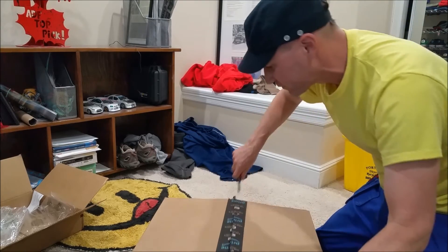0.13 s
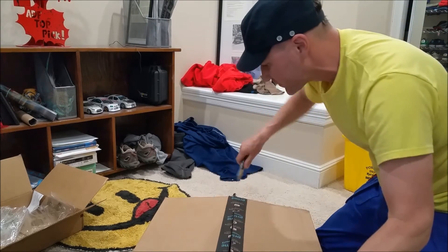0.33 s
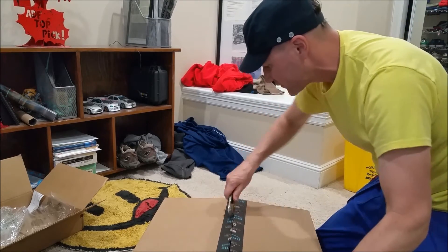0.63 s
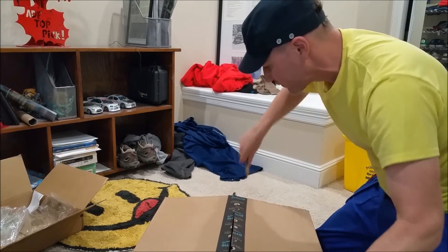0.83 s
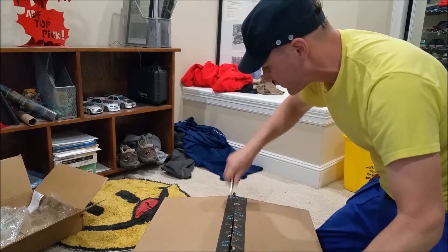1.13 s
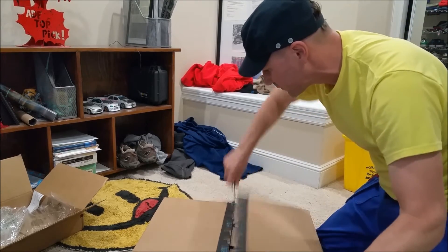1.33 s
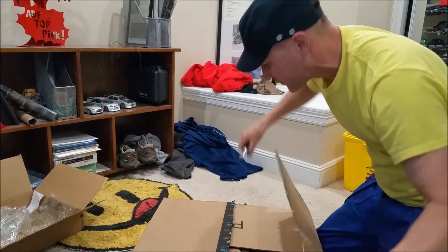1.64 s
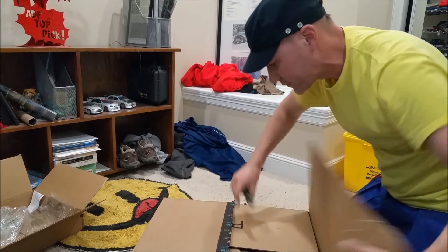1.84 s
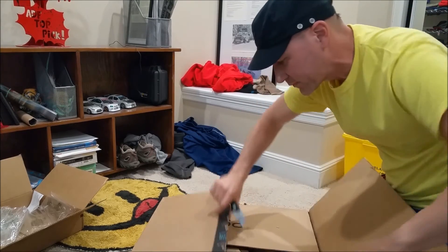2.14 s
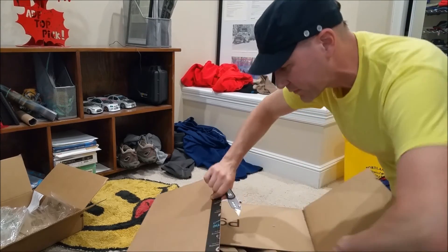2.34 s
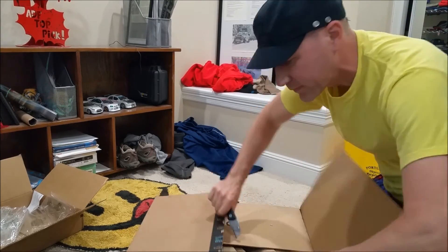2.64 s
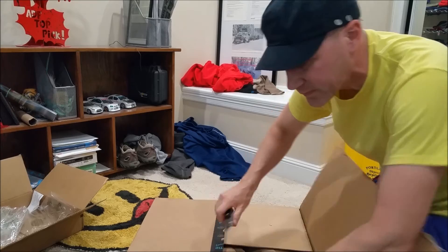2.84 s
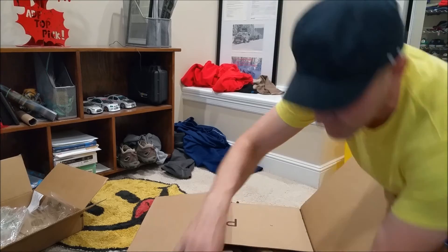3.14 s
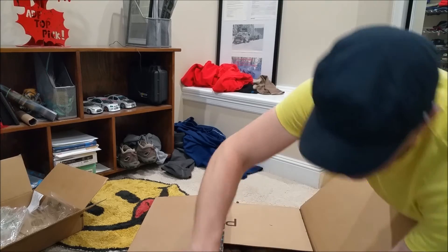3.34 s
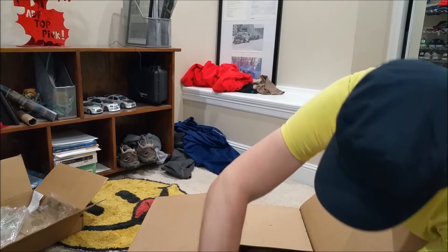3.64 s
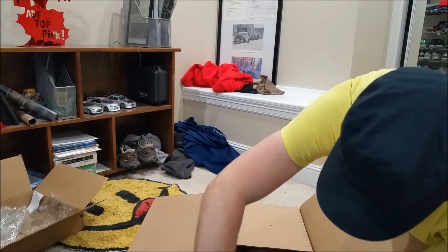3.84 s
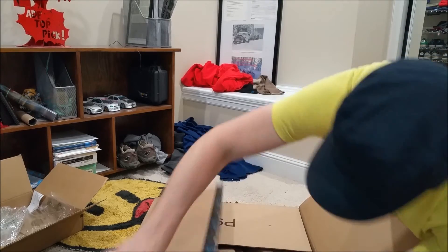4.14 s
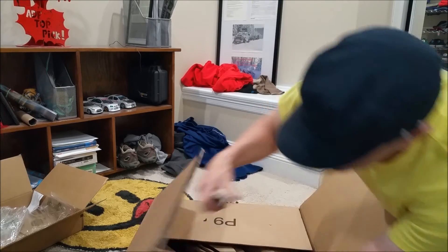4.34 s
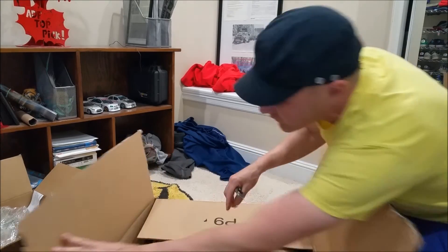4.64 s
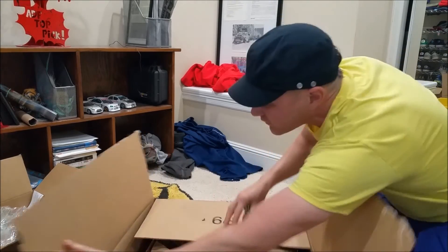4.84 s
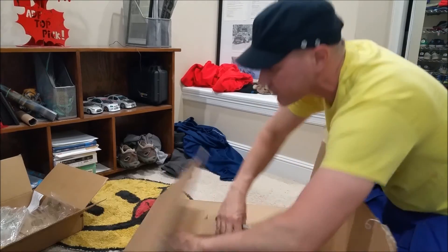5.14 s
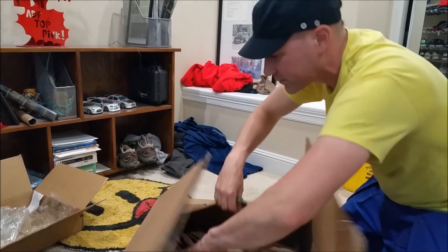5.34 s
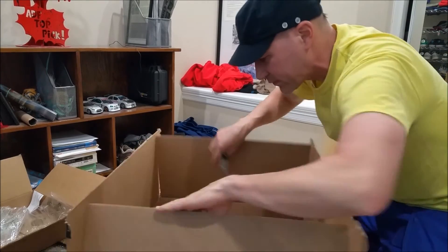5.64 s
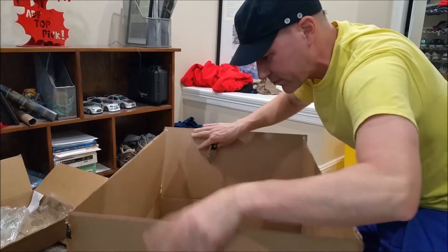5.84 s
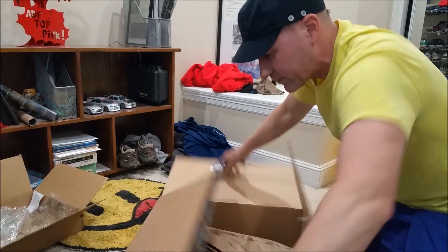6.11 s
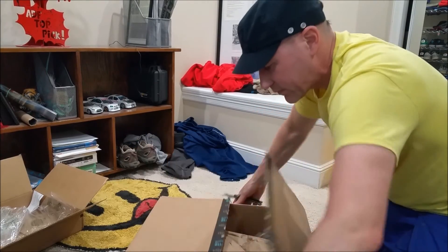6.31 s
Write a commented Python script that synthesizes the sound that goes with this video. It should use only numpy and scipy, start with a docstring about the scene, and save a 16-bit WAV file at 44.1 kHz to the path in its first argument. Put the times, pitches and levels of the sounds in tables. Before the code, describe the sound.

Close-up box opening: short tape-cutting scrapes, sharp cardboard snaps, low hollow thuds of flaps, and a final flurry of rough rubbing and rustle.

```python
"""Opening a cardboard box

A blade slits the tape of a cardboard box on a carpet; hands pull the flaps open and stiff paper rustles.
Rubbing and tearing are dense random clicks, heard directly in coloured bands and through damped panel modes.
Tape and board let go in resonant snaps; thuds are one low, wandering tone of the air inside the box.
A small furnished room adds a short tail, rumble, hiss and a faint appliance hum. A two-port phone microphone
hears it close by, its ports alike in the bass, unlike through the middle and alike again in the high treble."""
import sys
import numpy as np
from scipy import signal
from scipy.fft import rfft, irfft, next_fast_len
from scipy.io import wavfile
from scipy.ndimage import uniform_filter1d

SR = 44100
rng = np.random.default_rng(int(sys.argv[2]) if len(sys.argv) > 2 else 0)


def transcribe(signal):
    """Save signal, clipped to [-1, 1], as a 16-bit WAV file at the path in sys.argv[1]."""
    frames = np.atleast_2d(signal).T
    limited = np.clip(frames, -1, 1)
    pcm = np.round(limited * 32767).astype(np.int16)
    wavfile.write(sys.argv[1], SR, pcm)


N = 285327
SIZE = next_fast_len(N + SR)  # transform length, padded so that tails do not wrap round
HZ = np.arange(SIZE // 2 + 1) * SR / SIZE + 1  # 1 Hz up, so that its logarithm exists

# Steady noise of the room. Each row: frequency in Hz, relative density in dB per Hz.
AIR_COLOUR = [(25, 3.5), (64, 10.5), (100, -24), (290, 0), (400, -3), (1200, -11.5), (2000, -18.5),
              (7000, -95), (16000, -61)]
AIR_DB = -51.5
# Tones of the appliance. Each row: mean frequency in Hz, level before wavering in dB rms.
HUM_TONES = [(166.9, -57.5), (290.7, -58.5), (619.1, -64), (1857, -69)]

# Strokes of blade, fingers and paper on board. Each row: time of full level in seconds, rise in seconds,
# hold in seconds, then the levels of panels, dull rub, bright rasp and fine hiss in dB.
STROKES = [(0.0, .01, 0.2, -32.5, -35.5, -40.5, -43), (0.273, 0.078, 0.016, -26, -31, -37.5, -41.5),
           (0.374, 0.0021, 0.0099, -18.5, -25.5, -27.5, -33),
           (0.818, 0.0027, 0.0029, -23.5, -35.5, -58, -68), (0.893, 0.092, 0.012, -23.5, -31, -40.5, -40.5),
           (0.946, 0.075, 0.027, -23, -30.5, -37.5, -39.5), (1.418, 0.022, 0.022, -27, -46, -55.5, -57),
           (1.47, 0.0087, 0.027, -24, -37.5, -42.5, -42), (1.517, 0.018, 0.052, -21, -30.5, -35, -38.5),
           (2.006, 0.049, 0.023, -44, -50, -47.5, -50), (2.191, .006, 0.16, -39, -52.5, -54.5, -56),
           (2.339, .006, 0.019, -43, -41, -40, -49), (2.703, 0.14, 0.021, -68, -61, -64, -53.5),
           (2.839, 0.0071, 0.013, -34.5, -47, -65, -58), (2.898, 0.068, 0.041, -31.5, -46, -52.5, -54),
           (3.288, 0.35, 0.022, -60, -45.5, -48.5, -59), (3.49, 0.14, 0.086, -43, -40.5, -45, -52),
           (4.098, 0.1, 0.011, -39, -43, -43.5, -48.5), (4.128, 0.0049, 0.024, -13.5, -26, -32, -43),
           (4.24, 0.037, 0.14, -54, -44, -49, -53.5), (4.453, 0.04, 0.018, -48, -44.5, -56, -63),
           (4.868, 0.16, 0.081, -41.5, -51, -57.5, -51), (5.228, 0.14, 0.035, -47, -41, -50, -60),
           (5.347, .012, 0.17, -38.5, -55, -76, -79), (5.627, 0.16, 0.038, -29, -37, -35, -31),
           (5.769, 0.0051, 0.061, -13, -31.5, -39, -39.5), (5.85, .1, 0.098, -25, -36, -33, -35),
           (6.02, 0.055, 0.075, -30.5, -40, -40, -34.5), (6.097, 0.011, 0.0062, -19.5, -32.5, -37, -61),
           (6.262, 0.082, 0.014, -42, -43, -50, -45.5), (6.411, 0.024, 0.026, -37, -40.5, -50, -43)]
STROKE_FALL_S = 0.12
SPAN_DB = 30  # a rise or fall time covers this many dB
# Hands resting and shifting on the box between strokes. Each row: time in seconds, level in dB.
HANDLING = [(1.5, -65.5), (1.75, -59), (2.2, -53.5), (2.8, -57.5), (3.1, -54), (3.7, -55), (4.0, -63.5),
            (4.3, -48.5), (4.65, -59.5), (5.0, -50), (5.5, -53.5), (5.75, -48.5), (6.3, -51.5), (6.47, -41)]
# Handling levels in dB added for panels, rub, rasp and hiss, in that order.
HANDLING_MIX_DB = [6, 0, -4.5, -8]
HANDLING_BOOM_DB = 0.5  # added for the air in the box

# Damped modes of the panels. Each row: frequency in Hz, relative amplitude in dB, 60 dB decay in seconds.
PANEL_MODES = [(60.6, -17.5, 0.61), (154.6, -2.5, 0.15), (199, -1.5, 0.02), (241.5, 5.5, 0.11),
               (281.3, -2.5, 0.2), (376, 11.5, 0.024), (455, 4.5, 0.029), (506.4, -9, 0.16),
               (638, -9.5, 0.03), (827, -6, 0.037)]
# Colour of the dull rub. Each row: frequency in Hz, relative density in dB per Hz.
RUB_COLOUR = [(450, -20), (750, -6.5), (1300, -7), (2800, -11)]
# Colour of the bright rasp. Each row: frequency in Hz, relative density in dB per Hz.
RASP_COLOUR = [(2700, -16), (3600, 3.5), (5400, 0.5), (6500, -0.5), (7800, -10)]
# Colour of the fine hiss. Each row: frequency in Hz, relative density in dB per Hz.
HISS_COLOUR = [(6500, -12.5), (8500, -12), (11000, -7), (14500, -10.5)]
# An edge dragged along board or tape rings in one band. Each row: start in seconds, length before
# the fade in seconds, centre in Hz, width of each of two filter passes in Hz, level in dB.
SQUEALS = [(0.052, 0.081, 4780, 1000, -51), (1.47, .13, 6560, 800, -47), (5.85, 0.1, 3530, 1000, -43),
           (6.017, 0.054, 5270, 1810, -38)]

# Palms and flaps shoving the air in the box. Each row: time of full level in seconds, rise in seconds,
# fall in seconds, level in dB.
THUMPS = [(0.22, .2, 0.28, -27), (0.43, 0.12, .16, -25.5), (0.84, 0.055, 0.14, -29),
          (0.92, 0.12, 0.076, -21), (1.04, 0.11, 0.074, -32), (1.5, 0.16, 0.09, -33),
          (1.563, 0.044, 0.087, -9), (1.638, 0.02, 0.12, -17), (2.27, 0.13, 0.081, -33),
          (2.89, 0.073, 0.28, -34.5), (3.14, 0.32, 0.15, -37), (4.158, 0.034, 0.078, -14),
          (4.285, 0.17, 0.2, -21.5), (4.94, 0.071, 0.11, -39.5), (5.25, 0.18, 0.11, -43.5),
          (5.39, 0.061, 0.026, -25), (5.519, 0.06, 0.069, -18), (5.7, 0.086, 0.21, -24.5),
          (5.83, 0.1, 0.17, -20.5), (5.96, .08, 0.45, -37.5), (6.265, 0.041, 0.054, -33.5),
          (6.46, 0.031, .1, -25)]
# The air in the box rings higher once the last flaps stand open.
CAVITY_HZ, OPEN_HZ, OPENS_S = 95.1, 132.4, 5.77

# Tape and board letting go. Each row: start in seconds, relative level in dB, centre in Hz.
SNAPS = [(0.375, -11.5, 1710), (0.817, -28.5, 890), (1.408, -35.5, 1600), (1.466, -28, 1200),
         (1.545, -13.5, 1800), (1.906, -39.5, 3600), (1.997, -44, 5700), (2.195, -38, 900),
         (2.344, -29, 3200), (2.837, -38.5, 2180), (3.154, -42, 2500), (3.24, -45.5, 740),
         (3.366, -33.5, 805), (3.377, -41.5, 710), (3.396, -38, 2000), (3.45, -33, 4470), (3.656, -39, 900),
         (3.741, -34.5, 1490), (4.118, -15, 2310), (4.125, -16.5, 3000), (4.248, -26, 1400),
         (4.322, -35, 2210), (4.553, -42.5, 2450), (5.194, -38, 2200), (5.347, -39.5, 4000),
         (5.531, -40, 3000), (5.771, -13, 980), (5.809, -30, 2010), (6.098, -30.5, 584),
         (6.26, -31.5, 1190), (6.437, -26, 766)]
SNAP_Q, SNAP_SLOPE = 3.96, 0.26  # sharpness at 1 kHz; its exponent makes low knocks ring more than high ticks
SNAP_PUSH_DB = 6.5  # drive of the snaps into the panels

ROOM_T60_S, ROOM_DB = 0.22, -12.5

# Likeness of the two ports. Each row: frequency in Hz, likeness from 0 to 1.
PORT_LIKENESS = [(60, 0.86), (300, 1), (700, 0.52), (1400, 0.0956), (6000, 0.12), (9000, 0.83)]
# Shading by the phone's body. Each row: frequency in Hz, left minus right in dB.
PORT_TILT = [(60, -2), (200, 2.5), (1300, 0), (2400, 2.5), (4400, -2), (6800, -10), (9000, 0.5)]
BASS_CUT_HZ, TOP_HZ = 50.6, 15850
CEILING = 0.95  # full scale is 1


def undb(db):
    """Decibels express the logarithm of an amplitude ratio."""
    return 10 ** (np.asarray(db) / 20)


def unit(x):
    """Division by the root mean square gives unit power."""
    return x / np.sqrt(np.mean(x ** 2))


def along(table):
    """A spectrum known at a few points is interpolated on a logarithmic frequency axis."""
    hz, value = np.transpose(table)
    return np.interp(np.log(HZ), np.log(hz), value)


def shape(x, gain):
    """A linear filter multiplies the spectrum of a sound."""
    return irfft(rfft(x, SIZE) * gain, SIZE)[..., :N]


def walk(rate):
    """Random fluctuation: 'rate' Gaussian levels a second, joined by slews; spread near 1."""
    k = int(SR / rate)
    steps = np.repeat(rng.standard_normal(N // k + 1), k)
    return uniform_filter1d(steps, k)[:N]


def tone(hz):
    """A sinusoid of rms 1 whose phase is the running sum of its frequency."""
    return np.sqrt(2) * np.sin(2 * np.pi * np.cumsum(hz) / SR)


def swells(s, rise, hold, fall, *levels_db):
    """Gain of each layer: events rise and fall exponentially, and the powers of separate events add."""
    step = 32  # samples between computed gains
    t = np.arange(0, N + step, step) / SR - s[:, None]
    before = -t / rise[:, None]
    after = (t - hold[:, None]) / fall[:, None]
    distance = np.maximum(np.maximum(before, after), 0)
    power = undb(2 * np.array(levels_db)) @ undb(-2 * SPAN_DB * distance)
    return [np.interp(np.arange(N), np.arange(len(p)) * step, np.sqrt(p)) for p in power]


def air():
    """Stationary noise is coloured as rumble and hiss; hum is a sum of tones wavering in level and pitch."""
    hum = 0
    for hz, db in HUM_TONES:
        level = undb(db + 2.5 * walk(9))
        hum = hum + level * tone(hz * (1 + .012 * walk(30)))
    noise = shape(rng.standard_normal((2, N)), undb(along(AIR_COLOUR)))
    return undb(AIR_DB) * unit(noise) + hum


def handling_db():
    """The level of continuous contact is interpolated between the tabled times."""
    s, db = np.transpose(HANDLING)
    return np.interp(np.arange(N) / SR, s, db)


def hands():
    """Gains of panels, rub, rasp and hiss: the powers of strokes and quiet handling add."""
    s, rise, hold, *levels_db = np.transpose(STROKES)
    fall = np.full(len(s), STROKE_FALL_S)
    strokes = swells(s, rise, hold, fall, *levels_db)
    return np.hypot(strokes, undb(handling_db() + np.array(HANDLING_MIX_DB)[:, None]))


def slips(spread_db, patchy_db, rate):
    """Stick-slip of fibres: dense clicks of random size in uneven patches; one stream shared, one scattered."""
    excess = np.minimum(rng.exponential(size=N), 6.2)
    size = undb(spread_db * excess + patchy_db * walk(rate))
    return unit(size * rng.standard_normal((2, N)))


def ring(force, modes):
    """Modal resonance: a force excites damped sinusoids; a steady random force of rms 1 gives rms 1."""
    t = np.arange(SR // 2) / SR
    body = sum(undb(db) * np.sin(2 * np.pi * hz * t) * 1000. ** (-t / t60) for hz, db, t60 in modes)
    return shape(force, rfft(body / np.sqrt(np.sum(body ** 2)), SIZE))


def scrape(clicks, colour, drift_db):
    """Moving contact filters the clicks: each third of an octave swells and fades independently."""
    low, high = np.log2(colour[0][0]), np.log2(colour[-1][0])
    total = 0
    for centre in np.arange(low, high + .2, 1 / 3):
        band = np.exp(-((np.log2(HZ) - centre) / .25) ** 2)
        drift = undb(drift_db * walk(24))
        total = total + drift * shape(clicks, band * undb(along(colour)))
    return unit(total)


def squeals(clicks):
    """Stick-slip through one narrow resonance: it starts at once, holds, then fades exponentially."""
    out = np.zeros((2, N))
    for s, length, hz, width, db in SQUEALS:
        part = clicks[:, int(s * SR):int((s + 2 * length) * SR)]
        peak = signal.iirpeak(hz, hz / width, fs=SR)
        narrow = unit(signal.lfilter(*peak, signal.lfilter(*peak, part)))
        t = np.arange(part.shape[1]) / SR
        fade = undb(-SPAN_DB * np.maximum(t - length, 0) / (length / 2))
        out[:, int(s * SR):][:, :len(t)] += undb(db) * fade * narrow
    return out


def cavity():
    """Cavity resonance: one low tone whose pitch wanders as the walls and flaps shift."""
    s, rise, fall, db = np.transpose(THUMPS)
    thumps = swells(s, rise, 0 * s, fall, db)[0]
    boom = undb(handling_db() + HANDLING_BOOM_DB)
    gain = np.hypot(thumps, boom) * undb(1.8 * walk(25))
    pitch = np.where(np.arange(N) < OPENS_S * SR, CAVITY_HZ, OPEN_HZ) + 3.5 * walk(12)
    low = gain * tone(pitch)
    return np.array([low, low])


def cracks():
    """Impulsive release: a hard tick and short rattle excite the resonance of the board or tape that lets go."""
    out, t = np.zeros((2, N + SR)), np.arange(SR // 8) / SR
    for s, db, hz in SNAPS:
        decay = np.exp(-t / 0.0036) + undb(-4.0) * np.exp(-t / 0.02)
        rattle = decay * rng.standard_normal((2, len(t)))
        burst = rattle + undb(21.5) * (t == 0)  # the tick is one sample
        peak = signal.iirpeak(hz, SNAP_Q * (1000 / hz) ** SNAP_SLOPE, fs=SR)
        level = undb(db) * np.sqrt(SR / 4 / hz)  # makes up for the narrower bands of low snaps
        out[:, int(s * SR):][:, :len(t)] += level * signal.lfilter(*peak, burst)
    return out[:, :N]


def box():
    """Superposition: friction and snaps drive the panels, while the contact itself scrapes, rasps and hisses."""
    snaps = cracks()
    shake, rub, rasp, hiss = hands()
    drum = ring(shake * slips(2.5, 2.0, 60) + undb(SNAP_PUSH_DB) * snaps, PANEL_MODES)
    clicks = slips(2.6, 1.8, 90)
    fizz = unit(shape(slips(0.49, 2.0, 70), undb(along(HISS_COLOUR))))
    board = rub * scrape(clicks, RUB_COLOUR, 2.4) + rasp * scrape(clicks, RASP_COLOUR, 2.2)
    return cavity() + drum + board + hiss * fizz + snaps + squeals(clicks)


def room(dry):
    """Reverberation: walls and shelves return a diffuse, exponentially decaying tail."""
    t = np.arange(SR // 2) / SR
    noise = rng.standard_normal((2, len(t))) * (t > .004)  # the first returns come after 4 ms
    tail = noise * 1000. ** (-t / ROOM_T60_S)
    tail = tail / np.sqrt(np.sum(tail[0] ** 2))
    above_bass = dry[0] - shape(dry[0], HZ < 130)
    return dry + undb(ROOM_DB) * shape(above_bass, rfft(tail, SIZE))


def scene():
    """Spatial coherence: the ports hear nearly one sound in the bass and high treble;
    between them a scattered share differs."""
    shared, scattered = room(box()) + air()
    alike = np.clip(along(PORT_LIKENESS), 0, 1)
    mid = shape(shared, np.sqrt((1 + alike) / 2))
    side = shape(scattered, np.sqrt((1 - alike) / 2))
    return np.array([mid + side, mid - side])


def record(dry):
    """Shading by the phone's body tilts the ports; rumble is cut, loud peaks saturate and the top is cut."""
    half = undb(along(PORT_TILT) / 2)
    ports = shape(dry, np.array([half, 1 / half]))
    bass_cut = signal.butter(4, BASS_CUT_HZ, "high", fs=SR, output="sos")
    ports = signal.sosfilt(bass_cut, ports)
    ports = CEILING * np.tanh(ports / CEILING)
    top_cut = signal.ellip(10, .2, 85, TOP_HZ, fs=SR, output="sos")
    return signal.sosfilt(top_cut, ports)


dry = scene()
out = record(dry)
transcribe(out)
```